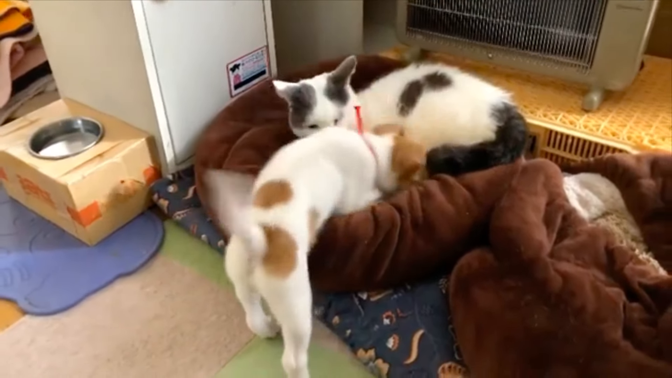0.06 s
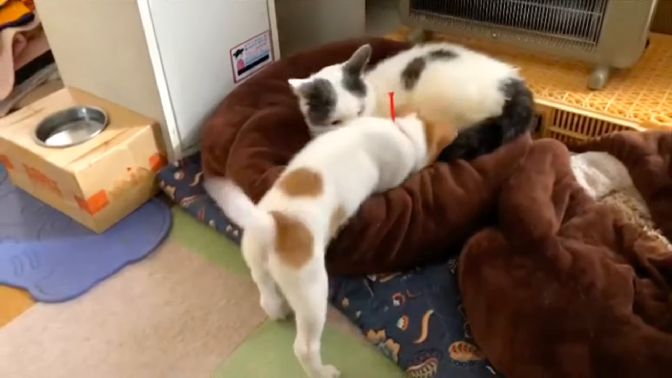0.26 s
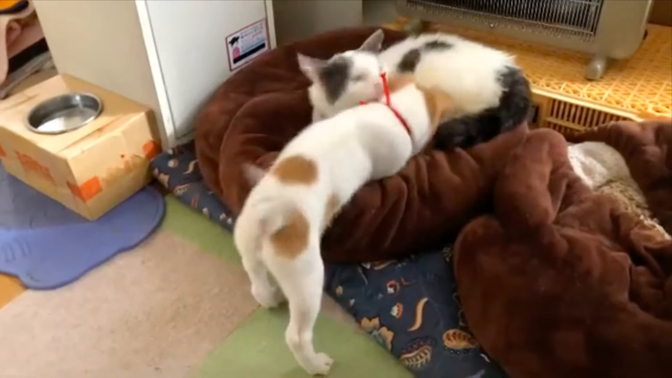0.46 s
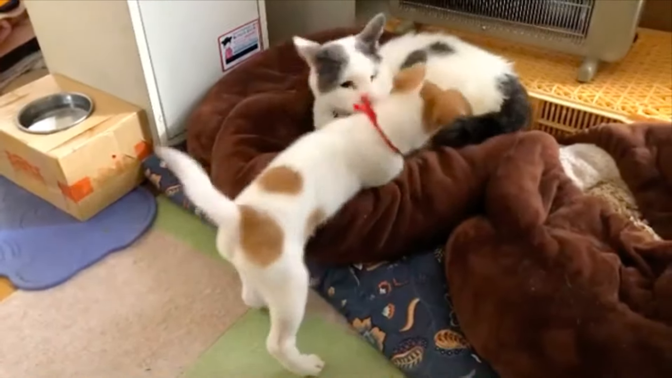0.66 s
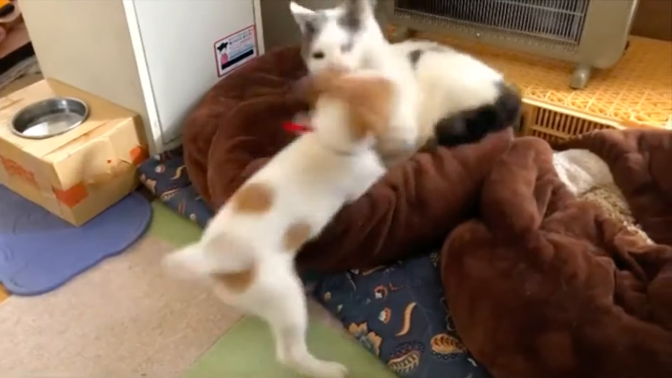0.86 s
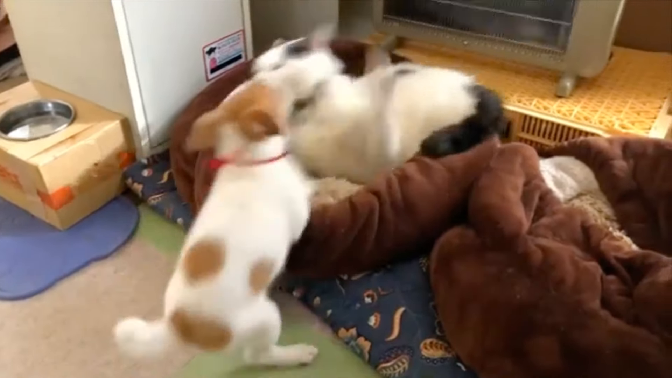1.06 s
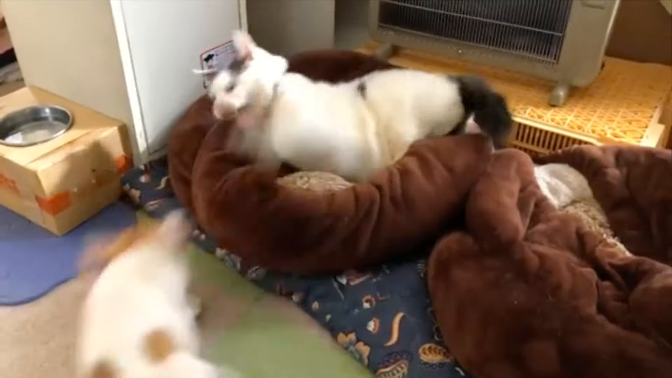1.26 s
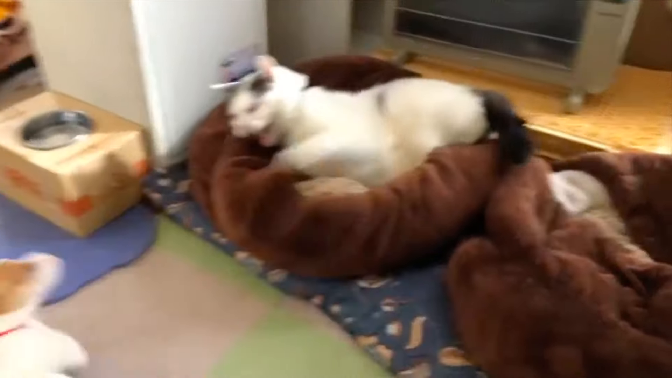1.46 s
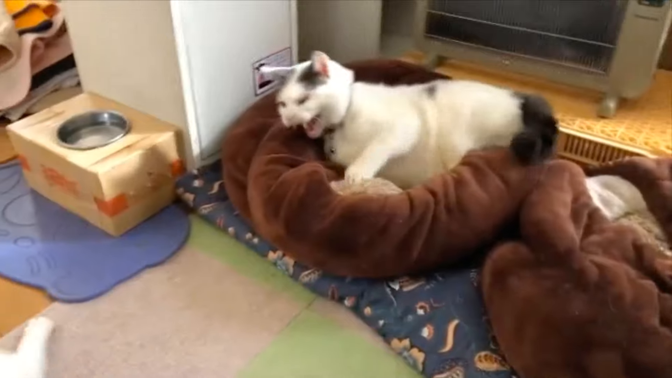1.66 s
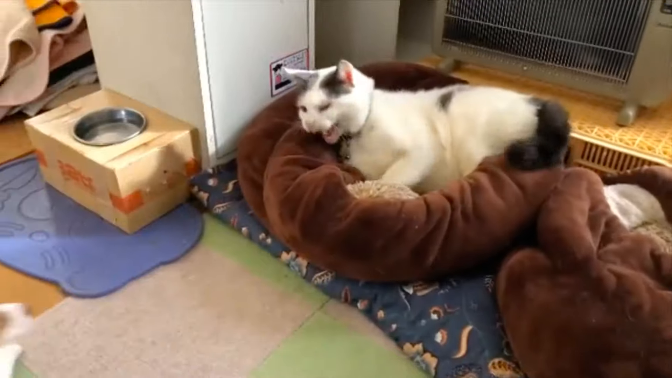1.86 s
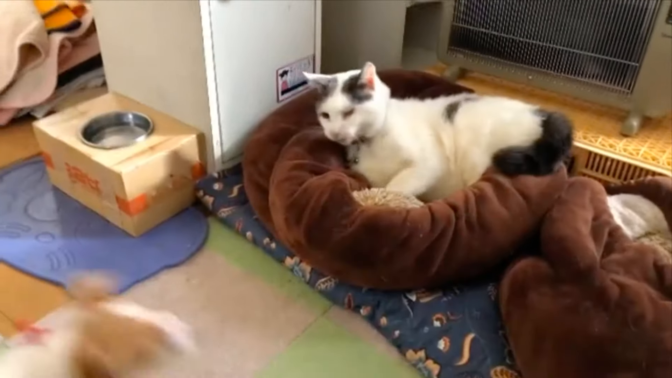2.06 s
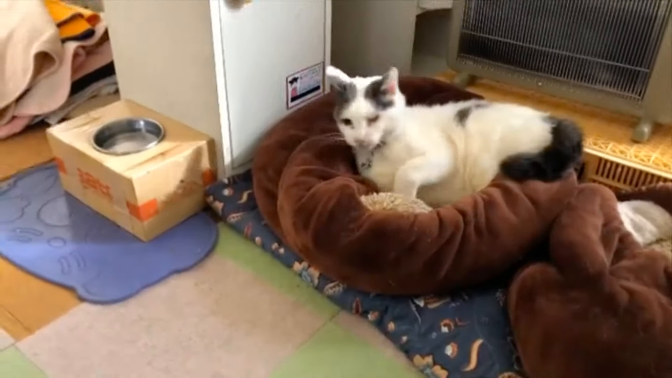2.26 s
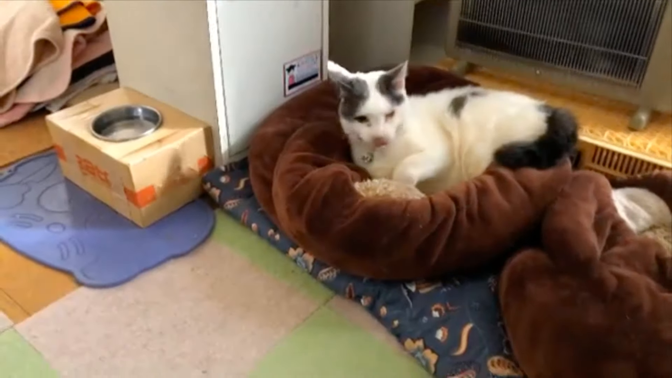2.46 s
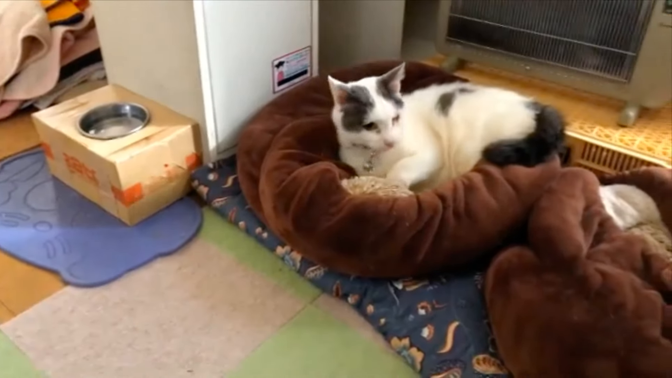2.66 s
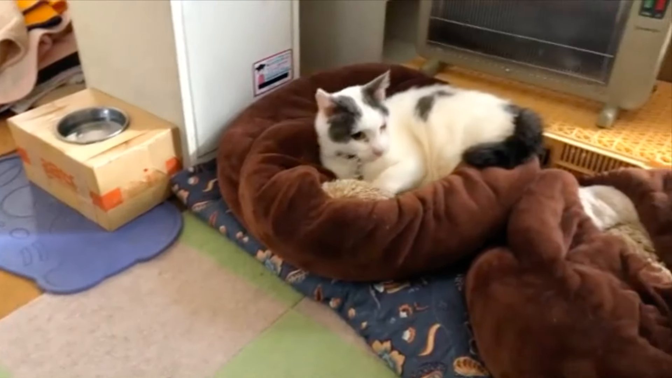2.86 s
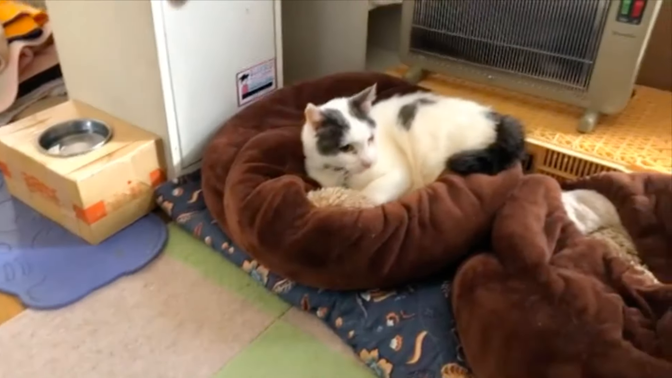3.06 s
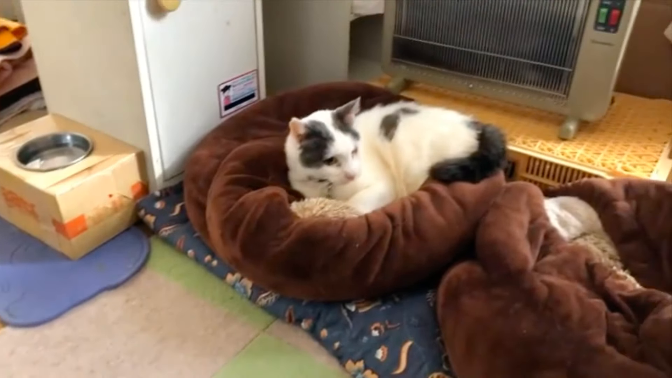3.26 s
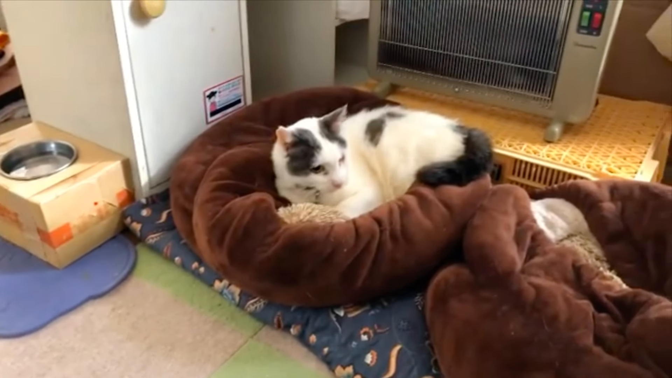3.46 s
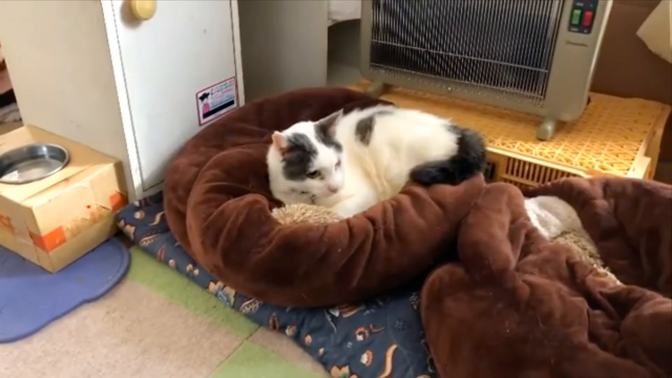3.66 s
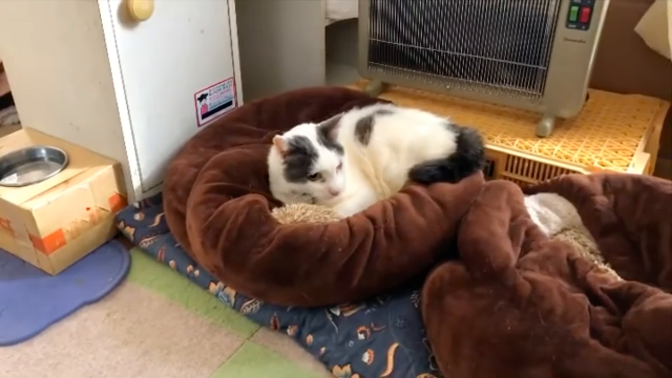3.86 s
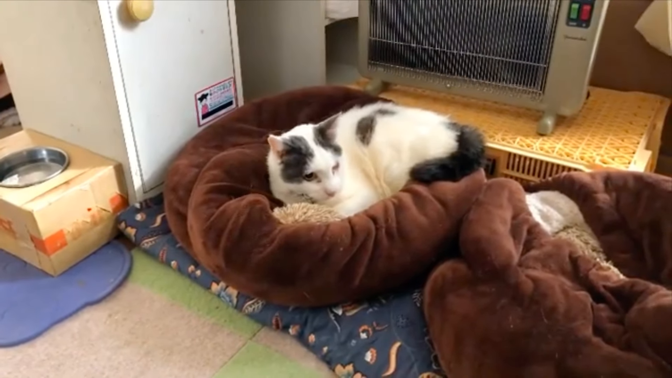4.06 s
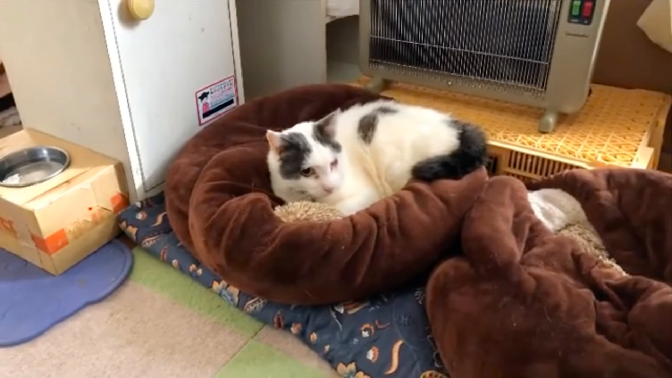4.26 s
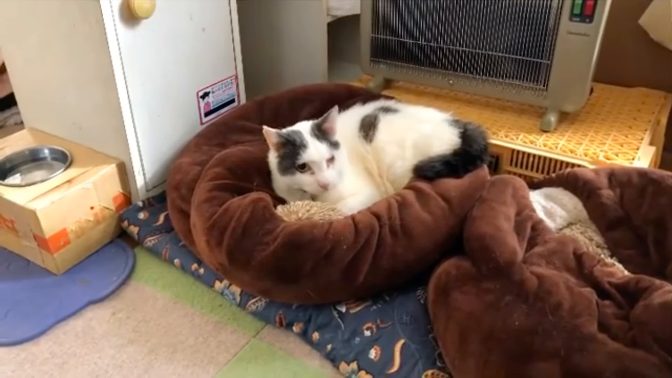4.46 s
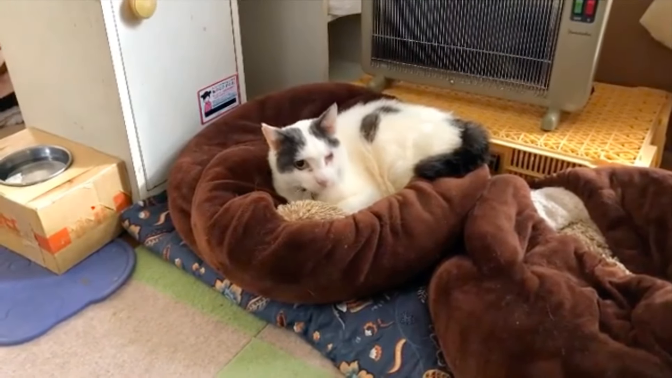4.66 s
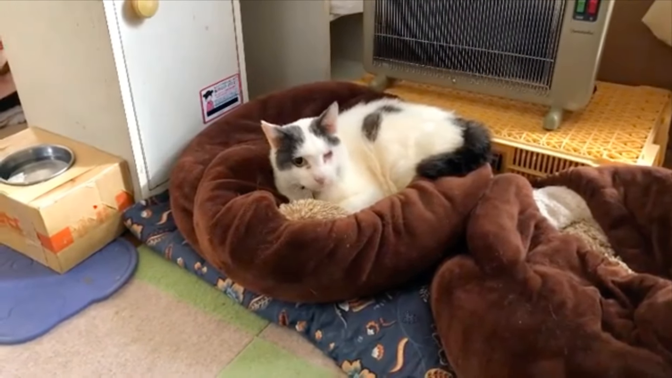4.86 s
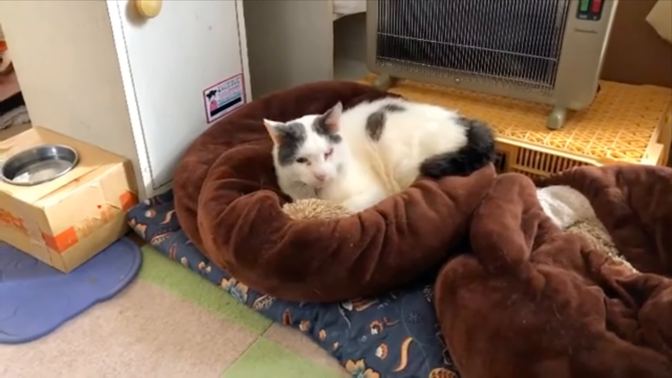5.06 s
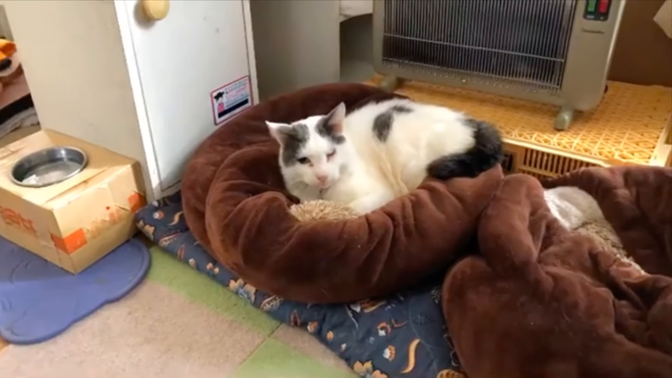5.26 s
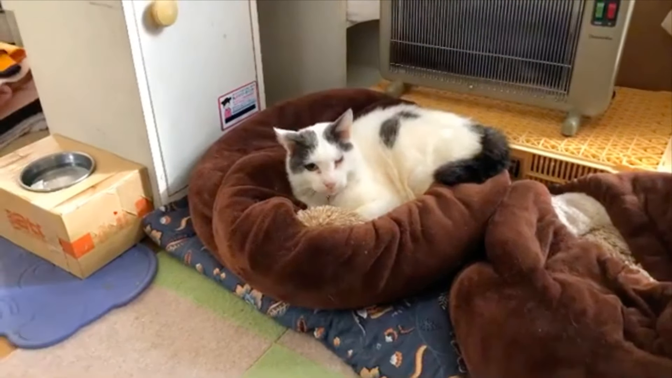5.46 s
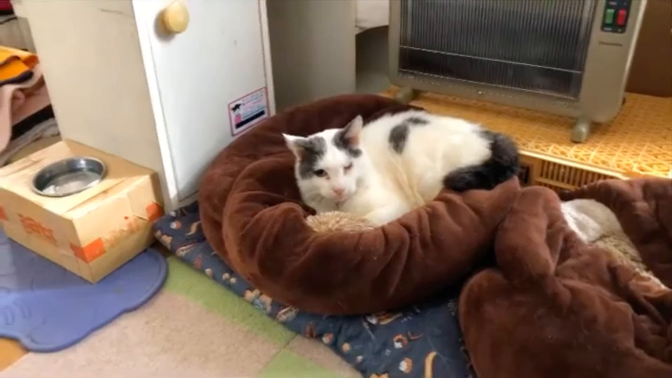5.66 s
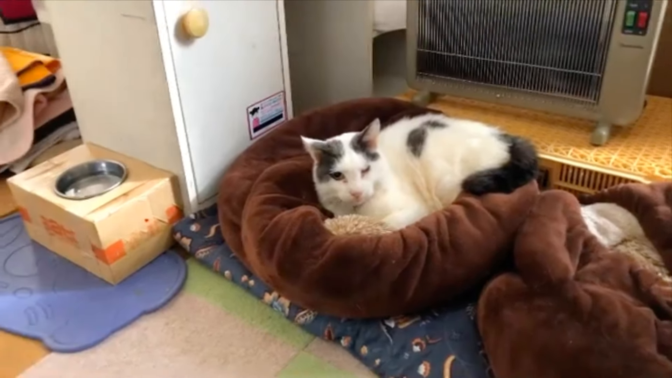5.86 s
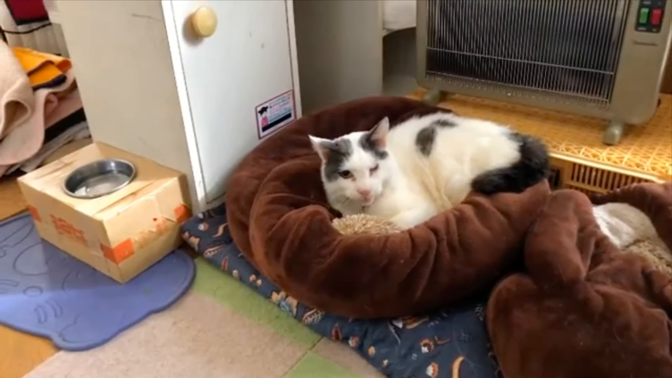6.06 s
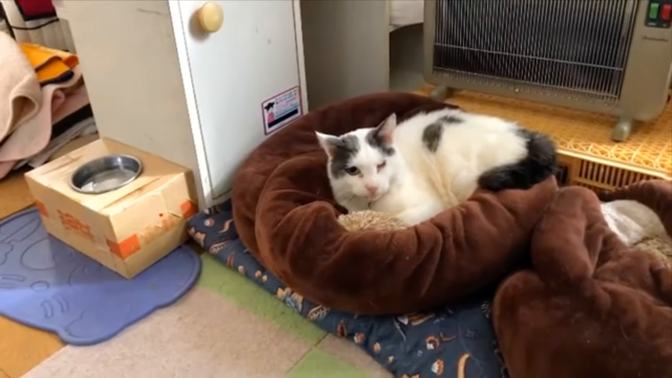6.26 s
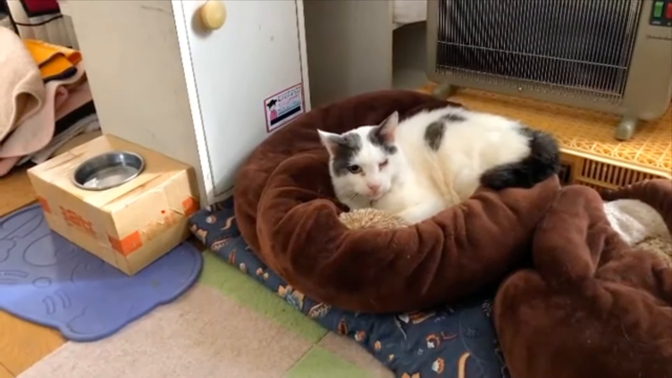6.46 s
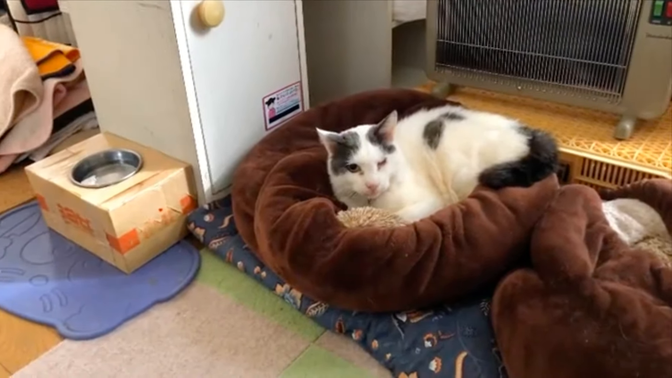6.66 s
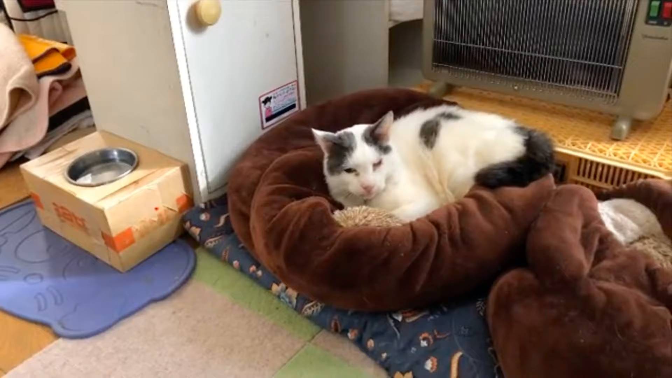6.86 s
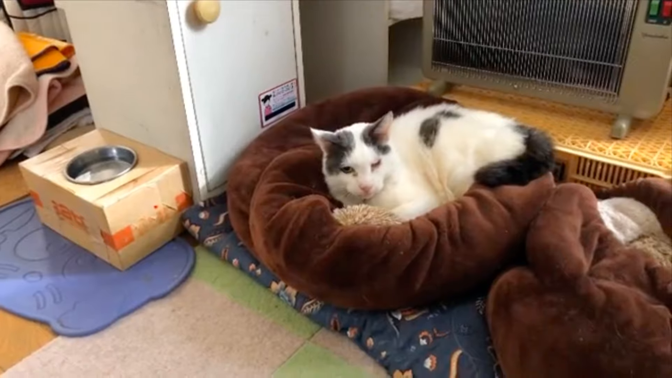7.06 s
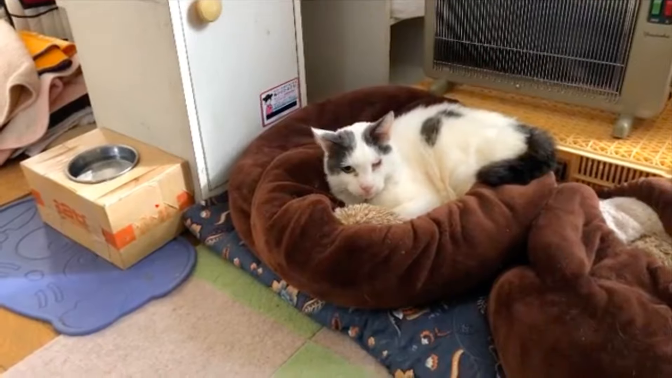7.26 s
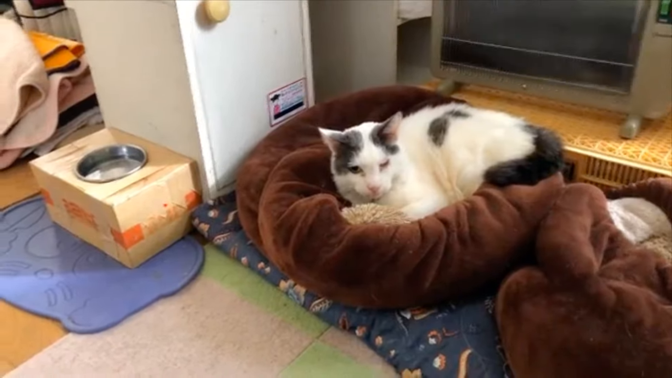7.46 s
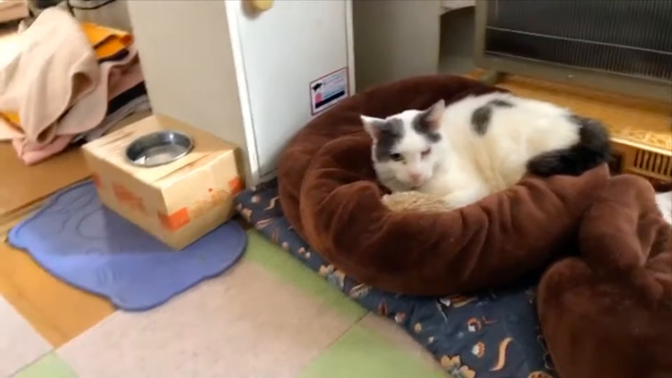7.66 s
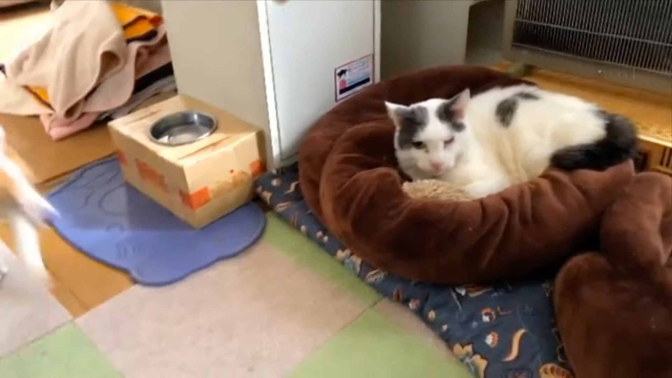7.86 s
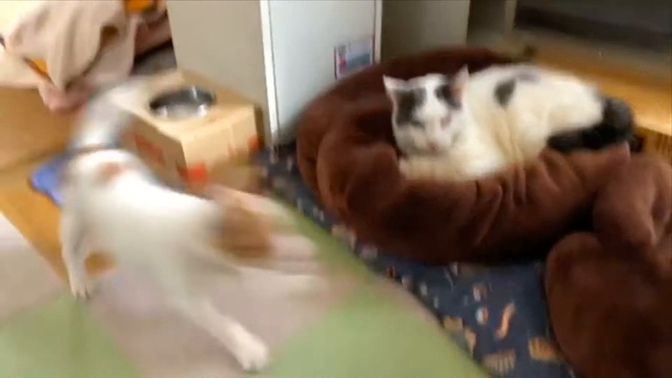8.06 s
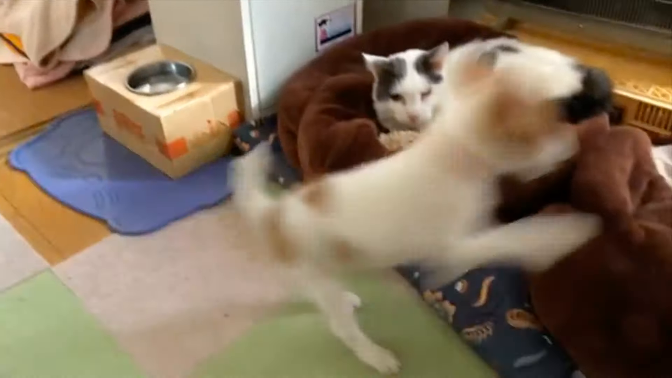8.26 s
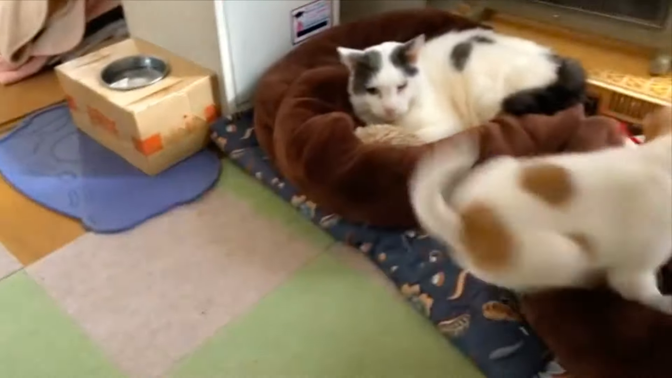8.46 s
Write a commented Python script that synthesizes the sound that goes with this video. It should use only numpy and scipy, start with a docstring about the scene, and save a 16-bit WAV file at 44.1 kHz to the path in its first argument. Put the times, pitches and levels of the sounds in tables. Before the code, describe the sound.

A furnished small room hums low with a faint fan drone throughout. At about 0.5 s a nearby cat utters a short, rough mew, rising then falling as it closes, lasting 0.3 s. From 0.8 to 1.3 s there is a scuffle: dull smacks, crisp snaps, fur rustle and a tiny, high collar bell rattling. At 1.3 s the cat spits into a forceful, airy hiss until about 1.95 s, while deep floor booms mark the puppy bounding off. Lighter thumps follow near 2.2 s. From 2.45 to 3.9 s claws dig at carpet in rapid, quickening scratches, strongest around 3.3 s. Hollow knocks and rustles run from 4 to 5 s, then heavy pounces boom at 5.2-5.6 s. Claws tick over boards at 5.9-6.35 s; near quiet follows. At 7.4 s clicks and thuds return, galloping closer to 8.4 s with a snap and faint hoarse skids.

```python
"""The low hum of a small room is heard first; then a cat in its bed mews as a puppy pesters it.
They scuffle, a collar bell jingles and the cat hisses. The puppy romps off, scrabbles at the carpet,
pounces, skitters over bare boards and gallops back, and the wooden floor booms under its paws.
Voice and breath are sources filtered by resonances, floor and bell are sums of decaying modes,
and friction is shaped, grainy noise."""
import sys
import numpy as np
from scipy import signal
from scipy.fft import rfft, irfft, next_fast_len
from scipy.io import wavfile
from scipy.ndimage import uniform_filter1d

SR = 44100
rng = np.random.default_rng(int(sys.argv[2]) if len(sys.argv) > 2 else 0)


def generate_wav(sig):
    """Save sig (samples, or channels by samples) to the path in sys.argv[1] as 16-bit PCM at SR."""
    pcm = np.round(np.clip(np.atleast_2d(sig).T, -1, 1) * 32767).astype(np.int16)
    wavfile.write(sys.argv[1], SR, pcm)


N = 375732
TIME = np.arange(N) / SR
BLOW = TIME[:SR // 2]  # time axis of one impact [s]


def amp(db):
    """Level: decibels to amplitude gain."""
    return 10 ** (np.asarray(db) / 20)


def unit(x):
    """Normalisation: scales a signal to rms 1."""
    return x / np.sqrt(np.mean(x ** 2) + 1e-20)


def read(points, hz):
    """Interpolation: reads a curve on a log-frequency axis."""
    f, value = np.transpose(points)
    return np.interp(np.log(hz + 1), np.log(f), value)


def add(mix, s, sound):
    """Superposition: mixes a sound in at s seconds."""
    part = mix[max(round(s * SR), 0):][:len(sound)]
    part += sound[:len(part)]


def wander(size, hz):
    """Low-pass fluctuation: smooth chance of rms 1, with a Gaussian roll-off at hz."""
    draws = rng.standard_normal(next_fast_len(size))
    f = np.fft.rfftfreq(len(draws), 1 / SR)
    smooth = irfft(rfft(draws) * np.exp(-(f / hz) ** 2), len(draws))
    return unit(smooth[:size])


def noise(spectrum, size, grain_db=0, ripple_db=0):
    """Spectral shaping: coloured noise of rms 1, clumped into millisecond grains, with chance peaks."""
    padded = next_fast_len(size)
    hz = np.fft.rfftfreq(padded, 1 / SR)
    grains = rng.standard_normal(padded) * amp(grain_db * wander(padded, 940))
    knots = np.arange(0, SR, 330)  # the peaks are a few hundred Hz wide
    ripple = ripple_db * np.interp(hz, knots, rng.standard_normal(len(knots)))
    shaped = irfft(rfft(grains) * amp(read(spectrum, hz) + ripple), padded)
    return unit(shaped[:size])


def resonate(x, hz, width):
    """Resonance: shifts hz down to zero, low-passes twice and shifts back; hz may follow a curve."""
    turn = np.exp(2j * np.pi * np.cumsum(hz * np.ones(len(x))) / SR)
    r = np.exp(-np.pi * width / SR)
    slow = signal.lfilter([(1 - r) ** 2], [1, -2 * r, r * r], x / turn + 1e-18)
    return 2 * (turn * slow).real


def burst(rise, t60):
    """Impact envelope: a quick rise and an exponential decay, peak 1."""
    shape = (1 - np.exp(-BLOW / rise)) * np.exp(-np.log(1000) * BLOW / t60)
    return shape / shape.max()


def uneven(start, gap, count, scatter):
    """Loose rhythm: each beat is displaced by a random share of the gap."""
    return start + gap * (np.arange(count) + scatter * rng.standard_normal(count))


# the cat's complaint: (time [s], pitch [Hz], level [dB], roughness [ratio, held to 0.25-1])
MEW = [(.475, 540, -61, .55), (0.504, 578, -41.5, 0.3), (.548, 587, -42.5, 0.4), (.563, 634.5, -32, 0.23),
       (.585, 626.6, -32, 0.35), (.605, 682, -33, 0.54), (.625, 713.5, -40, 0.94), (.643, 692, -26.5, 0.71),
       (.665, 719, -33, 0.32), (0.693, 640, -34, 0.5), (.731, 600, -32, 1.04), (.76, 520, -60, 0.8)]
# fixed resonances of the throat: (frequency [Hz], width [Hz], relative level [dB])
THROAT = [(680, 190, -3), (1430, 47, 2.5), (2010, 210, -3), (3040, 360, -13), (5570, 960, -16)]
# the moving resonance of the mouth starts to fall at the given time
MOUTH_OPEN_HZ, MOUTH_SHUT_HZ, MOUTH_CLOSES_S = 2590, 1370, 0.6


def mew(jitter=0.0474, mouth_width_hz=900, shimmer_db=3):
    """Source-filter principle: jittery vocal pulses and breath pass a mouth that closes."""
    s, *columns = np.transpose(MEW)
    t = np.arange(s[0], s[-1], 1 / SR)
    hz, db, rough = (np.interp(t, s, c) for c in columns)
    mouth_hz = np.interp(t, [MOUTH_CLOSES_S, s[-1]], [MOUTH_OPEN_HZ, MOUTH_SHUT_HZ])
    rough = np.clip(rough, .25, 1)
    # roughness scales the jitter of pitch and the shimmer of level
    turns = np.cumsum(hz * (1 + jitter * rough * wander(len(t), 210))) / SR
    harmonics = sum(np.cos(2 * np.pi * k * turns) for k in range(1, 11))
    folds = unit(harmonics) * amp(shimmer_db * rough * wander(len(t), 210))
    breath_puffs = (1 + np.cos(2 * np.pi * turns)) * rng.standard_normal(len(t))
    drive = (1 - rough / 2) * folds + rough * breath_puffs
    drive *= 1 + rough * np.cos(np.pi * turns) / 2  # strong and weak pulses alternate as the voice breaks
    voice = resonate(drive, mouth_hz, mouth_width_hz)
    voice += sum(amp(g) * resonate(drive, f, w) for f, w, g in THROAT)
    loudness = np.sqrt(uniform_filter1d(voice ** 2, size=900) + 1e-12)
    out = np.zeros(N)
    add(out, s[0], amp(db) * voice / loudness)
    return out


# mouth resonances of the long breath: (frequency [Hz], width [Hz], relative level [dB])
HISS_MOUTH = [(890, 780, 2), (1240, 720, 2), (2620, 1060, -3), (3530, 240, -0.5), (4230, 510, -3),
              (5000, 1030, -3.5)]
# mouth resonances of the spit: (frequency [Hz], width [Hz], relative level [dB])
SPIT_MOUTH = [(940, 180, -3), (2910, 450, -8.5), (3680, 550, -4), (5230, 890, -8)]
# spectrum of the open breath: (frequency [Hz], relative density [dB per Hz])
HISS_AIR = [(150, 2.5), (300, 3.5), (600, -6.5), (1900, -32), (4000, -17), (6500, -11), (9000, -28)]
# spectrum of air past the teeth: (frequency [Hz], relative density [dB per Hz])
HISS_TEETH = [(4000, -39), (6500, -5), (8500, -1.5), (10500, 1.5), (12000, 1.5), (14000, -5)]
# one breath: attack, hold and release
HISS_START_S, HISS_ATTACK_S, HISS_END_S, HISS_RELEASE_DB_PER_S = 1.295, 0.05, 1.94, 173
HISS_BURST_DB, HISS_BURST_S = 5.5, 0.019  # extra pressure at the top of the attack, and its time constant
HISS_ECHO_MS, HISS_ECHO_DRIFT_MS_PER_S, HISS_ECHO_DB = 3.6, 3.8, -9


def hiss(air_db=-4, flutter_db=0.8):
    """Turbulence noise: a spit through a tight throat opens into a breath that sizzles past the teeth."""
    spit = breath_through(SPIT_MOUTH) * breath(-26, sag_db_per_s=35)
    air = breath_through(HISS_MOUTH) + amp(air_db) * noise(HISS_AIR, N)
    body = unit(air) * breath(-26, sag_db_per_s=-0.5)
    teeth = noise(HISS_TEETH, N, grain_db=2.5) * breath(-26, sag_db_per_s=12.5)
    return drifting_echo(spit + body + teeth) * amp(flutter_db * wander(N, 38))


def breath_through(resonances, tremble=.022, flicker_db=1.5, rasp_db=2.8):
    """Formant filtering: rasping air in mouth resonances that shift as tongue and jaw tremble."""
    rasp = amp(rasp_db * wander(N, 330))
    out = np.zeros(N)
    for hz, width, db in resonances:
        level = amp(db + flicker_db * wander(N, 3.3))
        moving_hz = hz * (1 + tremble * wander(N, 10))
        out += level * resonate(rasp * rng.standard_normal(N), moving_hz, width)
    return unit(out)


def breath(level_db, sag_db_per_s):
    """Pressure envelope: attack with a burst, a drifting hold (a negative sag swells), release."""
    age = TIME - HISS_START_S
    held = np.maximum(age - HISS_ATTACK_S, 0)
    released = np.maximum(TIME - HISS_END_S, 0)
    db = level_db + HISS_BURST_DB * np.exp(-held / HISS_BURST_S) - sag_db_per_s * held
    return np.clip(age / HISS_ATTACK_S, 0, 1) ** 2 * amp(db - HISS_RELEASE_DB_PER_S * released)


def drifting_echo(x):
    """Comb interference: a cabinet reflection whose path lengthens as the cat draws back; notches fall."""
    delay_s = (HISS_ECHO_MS + HISS_ECHO_DRIFT_MS_PER_S * (TIME - HISS_START_S)) / 1000
    echo = amp(HISS_ECHO_DB) * np.interp(TIME - delay_s, TIME, x)
    return (x + echo) / np.hypot(1, amp(HISS_ECHO_DB))


# swats and knocks: (time [s], smack level [dB], bright snap level [dB], t60 [s])
SWATS = [(.826, -21, -40.5, 0.029), (.911, -26, -31, 0.058), (.926, -44, -16, 0.033),
         (1.061, -35, -15, 0.021), (1.072, -31, -40, 0.029), (1.085, -23.5, -20, 0.032),
         (1.088, -11, -29, 0.0098), (1.184, -44, -20, 0.027), (1.201, -51, -19, 0.062),
         (1.217, -32, -18, 0.1), (1.261, -12, -23, 0.019), (1.268, -15, -32, 0.0087),
         (2.288, -36, -61, .06), (2.683, -27, -43, 0.039), (5.224, -24, -55, 0.033),
         (5.555, -25, -54, 0.023), (5.8, -32.5, -16.5, 0.12), (8.186, -54, -21.5, 0.06)]
# spectrum of the smack: (frequency [Hz], relative density [dB per Hz])
SMACK = [(200, -5), (800, 7.5), (1400, 3), (2700, -4.5), (5000, -10.5), (9000, -51)]
# spectrum of the snap: (frequency [Hz], relative density [dB per Hz])
SNAP = [(2500, -21.5), (5500, -6.5), (7000, -6), (8900, 7), (10500, -1), (14000, -5)]


def swats():
    """Impact noise: paws, claws and collar strike things with a dull smack and a crackling snap."""
    out = np.zeros(N)
    for s, smack, snap, t60 in SWATS:
        strike = burst(.0002, t60)
        dull = noise(SMACK, len(BLOW), grain_db=1.5, ripple_db=3) * strike
        crackle = noise(SNAP, len(BLOW), grain_db=2, ripple_db=2.5) * strike
        blow = amp(smack) * unit(dull) + amp(snap) * unit(crackle)
        add(out, s, blow * np.sqrt(np.mean(strike ** 2)))
    return out


# single strikes of the pellet in the collar bell, strong and faint: (time [s], relative level [dB])
JINGLES = [(.925, -16), (0.989, -24.5), (1.06, -18.5), (1.1233, -18), (1.1539, -19), (1.1837, -17),
           (1.2008, -9), (1.2156, -15), (1.5045, -25), (1.666, -24.5), (2.815, -36.5)]
# modes of the bell: (frequency [Hz], relative level [dB], t60 [s])
BELL = [(8800, -25, 0.085), (9610, -8, 0.15), (9640, 1, 0.025), (10400, -19, 0.11), (12790, -36, .1)]
# the pellet bounces about during the scuffle
RATTLE_START_S, RATTLE_GAP_S, RATTLE_DB = 1.085, .027, -20.5


def bell(level_db=-3):
    """Modal synthesis: each strike rings the inharmonic modes of a tiny pellet bell damped by fur."""
    out = np.zeros(N)
    rattle = [(s, RATTLE_DB) for s in uneven(RATTLE_START_S, RATTLE_GAP_S, count=7, scatter=.12)]
    for s, db in JINGLES + rattle:
        ring = np.zeros(len(BLOW))
        for hz, mode_db, t60 in BELL:
            struck_hz = hz * (1 + 0.0017 * rng.standard_normal())
            ring += amp(mode_db) * burst(0.00076, t60) * np.sin(2 * np.pi * struck_hz * BLOW)
        add(out, s, amp(db + level_db) * ring)
    return out


# paws and bodies landing: (time [s], relative boom level [dB], relative knock level [dB])
THUMPS = [(0.992, -21.5, -33), (1.173, -23.5, -35.5), (1.334, -12, -28), (1.368, -3.5, -25),
          (1.429, 2.5, -39), (1.461, 3, -33), (1.495, -8, -33), (1.645, -15, -31.5), (1.822, -13.5, -26),
          (2.13, -15.5, -32), (2.22, -17.5, -37), (2.3, -11, -23.5), (3.183, -28, -24.5), (3.253, -26, -26),
          (3.543, -18, -40), (3.611, -33, -24), (4.142, -38, -16), (4.181, -25, -13), (4.254, -13, -17),
          (4.386, -26, -19.5), (4.558, -25, -20), (4.61, -19, -22), (4.789, -40, -20.5), (4.816, -42, -14),
          (4.869, -19, -18.5), (4.964, -12.5, -13), (5.001, -24, -37), (5.203, -28, -12), (5.221, -4.5, -7),
          (5.249, -23, -12), (5.28, 0.5, -19), (5.447, -3, -19), (5.549, 0, -8.5), (5.837, -26, -22),
          (5.876, -13.5, -25.5), (5.987, -15, -29), (6.085, -19, -43), (6.156, -12, -24.5),
          (6.255, -23, -20), (6.343, -22, -21.5), (7.434, -23.5, -25), (7.569, -23.5, -26),
          (7.643, -15, -26.5), (7.687, -11, -51), (7.784, -13, -33), (7.827, -11, -37), (7.97, -38, -21.5),
          (8.011, -13.5, -28), (8.091, -10, -26), (8.143, -6, -38), (8.192, -32, -14), (8.244, -8.5, -19),
          (8.33, -28, -22.5), (8.371, -15.5, -18.5)]
# modes of the floor: (frequency [Hz], relative level [dB], t60 [s])
FLOOR = [(106, -0.5, 0.21), (134.3, 4.5, 0.16), (164.1, -5, 0.25), (189.5, -10.5, 0.45),
         (217.4, -1.5, 0.065), (258.5, -6.5, 0.17), (317.6, -16, 0.43), (370.5, -12, 0.39), (452, -3, 0.09),
         (541, -11.5, 0.12), (702, -11.5, 0.13)]
# spectrum of the pad's own pat: (frequency [Hz], relative density [dB per Hz])
PAD = [(100, -15), (250, 10), (400, 7.5), (700, -15.5), (1100, -11), (2000, -23), (5000, -54)]
SLAP_OF_KNOCK_DB = -11.5  # share of each knock that reaches the floor's high modes
# light steps as the puppy shifts its weight while it digs
SHUFFLE_START_S, SHUFFLE_GAP_S, SHUFFLE_BOOM_DB, SHUFFLE_KNOCK_DB = 2.535, .143, -26, -28.5


def thumps(slap_db=1, pat_db=1, pat_t60=0.12, spot_db=2, shift=0.0373):
    """Modal excitation: knock level drives the floor's higher modes, and each spot weights them anew."""
    out = np.zeros(N)
    hz, mode_db, t60 = np.transpose(FLOOR)
    for s, boom, knock in THUMPS + shuffle():
        slap = knock + SLAP_OF_KNOCK_DB
        force_db = read([(105, boom), (135, knock), (260, knock), (370, slap + slap_db)], hz)
        # modes above 150 Hz differ in sign, level and pitch from board to board
        weight = rng.choice([-1, 1], len(hz)) * amp(spot_db * rng.standard_normal(len(hz)))
        spot = np.where(hz > 150, weight, 1)
        detune = np.where(hz > 150, 1 + shift * rng.standard_normal(len(hz)), 1)
        rings = np.array([burst(0.6 / f, d) * np.sin(2 * np.pi * f * BLOW)
                          for f, d in zip(hz * detune, t60)])
        pat = amp(slap + pat_db) * noise(PAD, len(BLOW)) * burst(0.003, pat_t60)
        add(out, s, (amp(force_db + mode_db) * spot) @ rings + pat)
    return out


def shuffle(count=11, spread_db=2):
    """Gait rhythm: light, uneven steps as rows (time [s], boom [dB], knock [dB])."""
    force_db = spread_db * rng.standard_normal(count)
    s = uneven(SHUFFLE_START_S, SHUFFLE_GAP_S, count, scatter=0.0771)
    return list(zip(s, SHUFFLE_BOOM_DB + force_db, SHUFFLE_KNOCK_DB + force_db))


# hollow knocks and light scuffs of the paws, each ringing one board:
# (time [s], relative level [dB], pitch [Hz])
KNOCKS = [(2.290, -23, 683), (3.065, -25.5, 844), (3.438, -21.5, 970), (3.615, -19, 903), (3.774, -13, 267),
          (4.031, -21.5, 427), (4.179, -14, 527), (4.569, -7.5, 272), (4.814, -21.5, 1310),
          (4.826, -9, 264), (4.935, -23, 904), (4.963, -3, 307), (5.224, -7, 632), (5.25, -5.5, 325),
          (5.28, -7, 370), (5.547, -5, 336), (5.556, -17, 612), (6.212, -22.5, 703), (7.970, -17, 494)]


def knocks(level_db=-4, t60_at_330_hz=0.078):
    """Single-mode resonance: one board rings briefly at its own pitch, high ones more briefly."""
    out = np.zeros(N)
    for s, db, hz in KNOCKS:
        rough = unit(resonate(rng.standard_normal(len(BLOW)), hz, hz))
        ring = np.sin(2 * np.pi * hz * BLOW) + 0.09 * rough
        add(out, s, amp(db + level_db) * ring * burst(0.3 / hz, t60_at_330_hz * np.sqrt(330 / hz)))
    return out


# single strokes of the claws over the carpet: (time [s], relative level [dB], relative treble level [dB])
SCRAPES = [(4.1756, -31, -60), (4.3041, -33, -47), (4.8118, -34.5, -46), (5.2913, -32.5, -39.5),
           (5.5086, -29, -42)]
# spectrum of the carpet pile: (frequency [Hz], relative density [dB per Hz])
PILE = [(400, 1), (900, 6), (1600, 2), (2400, -5.5), (3600, -13.5), (5500, -18), (9000, -51)]
# spectrum of rubbed fibres, here and under the rustle: (frequency [Hz], relative density [dB per Hz])
FIBRES = [(2500, -2.5), (5500, 0), (8000, -4.5), (14000, -10.5)]
# digging at the carpet: the forepaws alternate, and the gap between strokes keeps shrinking
DIG_START_S, DIG_GAP_S, DIG_QUICKEN_S = 2.453, .1, .00051
# effort builds to a peak and eases off
DIG_DB, DIG_PEAK_S, DIG_BUILD_DB_PER_S, DIG_EASE_DB_PER_S = -26, 3.31, 8, 7
OFF_PAW_EARLY_DB, OFF_PAW_LATE_DB = -9, -1.5
DIG_TREBLE_DB = -15  # hiss of the fibres, relative to the stroke
SNAG_DB = 1


def scrapes(pile_db=-6, fibre_db=-2, snag_hz=2450, t60=0.12):
    """Friction: claws snag the carpet, then drag through the pile; hard strokes snag the most."""
    out = np.zeros(N)
    pluck = burst(.0002, .04)
    for s, db, treble in digging() + SCRAPES:
        catch = unit(resonate(rng.standard_normal(len(BLOW)), snag_hz, 2060))
        snag = amp(SNAG_DB + db + .2 * (db - DIG_DB)) * catch * pluck
        tufts = noise(PILE, len(BLOW), grain_db=3.5, ripple_db=2.8)
        pile = amp(db + pile_db) * tufts * burst(0.012, t60)
        fibres = noise(FIBRES, len(BLOW), grain_db=3, ripple_db=2)
        drag = amp(treble + fibre_db) * fibres * burst(0.021, 0.18)
        add(out, s, snag + pile + drag)
    return out


def digging(count=16):
    """Accelerating rhythm: strokes of alternate forepaws as rows (time [s], level [dB], treble [dB])."""
    k = np.arange(count)
    s = DIG_START_S + k * (DIG_GAP_S - DIG_QUICKEN_S * k)
    early = s < DIG_PEAK_S
    off_paw_db = np.where(early, OFF_PAW_EARLY_DB, OFF_PAW_LATE_DB) * (k % 2 == 0)
    slope = np.where(early, DIG_BUILD_DB_PER_S, DIG_EASE_DB_PER_S)
    db = DIG_DB - slope * abs(s - DIG_PEAK_S) + off_paw_db
    return list(zip(s, db, db + DIG_TREBLE_DB))


# claws tapping on the boards: (time [s], relative level [dB], pitch [Hz])
CLAWS = [(2.2942, -25, 4020), (5.9015, -14.5, 4260), (5.9679, -17, 4350), (5.9948, -20.5, 3400),
         (6.046, -21, 3700), (6.0634, -16.5, 4540), (6.1502, -18, 4600), (6.208, -14.5, 5000),
         (6.2303, -21, 5600), (6.25, -20.5, 3600), (6.34, -18.5, 4770), (7.422, -22, 3400),
         (7.447, -18, 3710), (7.518, -18, 3430), (7.553, -31, 3470), (7.5668, -8, 3040),
         (7.5733, -18, 4740), (7.634, -23.5, 3320), (7.67, -19.5, 3020), (7.7293, -20.5, 3930),
         (7.7719, -22, 3940), (8.107, -26.5, 4600)]
# spectrum of a claw on wood: (frequency [Hz], relative density [dB per Hz])
CLAW = [(500, -9.5), (1500, -11), (2000, -9), (2600, -4.5), (3300, -7), (4800, -3), (6300, -10),
        (7500, -14.5), (14000, -24.5)]


def claws(level_db=-7, ring_db=-5, ring_width_hz=1400, slide_db=-17, slide_t60=0.22):
    """Impact and friction: hard, short ticks, each with its own pitch, then a gritty slide."""
    out = np.zeros(N)
    strike = burst(.0002, .024)
    for s, db, hz in CLAWS:
        ring = unit(resonate(rng.standard_normal(len(BLOW)), hz, ring_width_hz))
        crack = noise(CLAW, len(BLOW), ripple_db=4)
        tick = (crack + amp(ring_db) * ring) * strike
        tick *= np.linalg.norm(strike) / np.linalg.norm(tick)  # same energy for every tick
        scratch = noise(CLAW, len(BLOW), grain_db=7)
        slide = amp(slide_db) * scratch * burst(0.00078, slide_t60)
        add(out, s, amp(db + level_db) * (tick + slide))
    return out


# paw pads skidding with a hoarse squeak: (time [s], length [s], pitch [Hz], level [dB])
SKIDS = [(8.108, 0.026, 1920, -49), (8.221, 0.07, 1780, -41.5), (8.245, 0.079, 2380, -51),
         (8.346, 0.016, 2320, -47)]


def skids(width_hz=320, octave_db=-8):
    """Stick-slip friction: the uneven slips of a pad give a fuzzy pitch and its octave."""
    out = np.zeros(N)
    for s, length, hz, db in SKIDS:
        slips = rng.standard_normal(round(length * SR))
        squeak = resonate(slips, hz, width_hz) + amp(octave_db) * resonate(slips, 2 * hz, 2 * width_hz)
        add(out, s, amp(db) * unit(squeak) * signal.windows.tukey(len(slips), .5))
    return out


# fur and paws sweeping over bedding and carpet:
# (start time [s], length [s], relative rub level [dB], relative swish level [dB])
RUSTLE = [(0.763, 0.34, -43, -47.5), (0.807, 0.19, -59, -38.5), (1.038, 0.06, -37, -33),
          (1.081, 0.255, -41, -33.5), (1.183, 0.087, -38, -24.5), (2.062, 0.21, -39.5, -51.5),
          (2.172, 0.067, -34.5, -44), (2.261, .76, -40.5, -52), (3.037, 0.97, -34, -51.5),
          (3.4, 0.093, -36, -55), (4.026, .15, -33, -51.5), (4.084, 1, -37.5, -56.5),
          (4.863, 0.12, -38, -55), (5.011, .11, -38, -48), (5.104, 0.24, -34, -50), (5.279, 0.1, -35, -43),
          (5.404, 0.26, -39.5, -61), (5.83, .11, -30, -38.5), (5.896, 0.558, -46.5, -49),
          (6.19, 0.18, -46, -60), (6.435, 0.13, -39, -56.5), (6.534, 0.25, -43.5, -54),
          (6.97, 0.1, -41.5, -68), (7.405, 0.54, -43.5, -46), (7.927, 0.52, -43, -55),
          (8.167, 0.045, -53, -31.5), (8.194, 0.11, -32, -49), (8.373, 0.046, -34, -41.5)]
# spectrum of the rub: (frequency [Hz], relative density [dB per Hz])
RUB = [(150, 8), (300, 8), (600, -1), (1000, -1.5), (1700, -7), (2500, -10), (4000, -14.5), (8000, -36.5)]
GRIT_PER_S, GRIT_DB = 220, -11.5  # stray ticks of grit and fibres under each sweep
SWEEP_EDGE_S = 0.033  # time a sweep takes to get going and to stop, less if it is very short


def rustle(rub_db=-2, swish_db=-1, clump_db=3):
    """Granular friction: fur on bedding and carpet; each sweep gets going, holds and stops."""
    low, high = np.zeros((2, N))
    for s, length, rub, swish in RUSTLE:
        edges = np.clip(2 * SWEEP_EDGE_S / length, 0, 1)
        speed = signal.windows.tukey(round(length * SR), edges)
        add(low, s, amp(rub + rub_db) * speed)
        add(high, s, amp(swish + swish_db) * speed)
    fibres = unit(noise(FIBRES, N, grain_db=2) + amp(GRIT_DB) * grit())
    friction = low * noise(RUB, N, grain_db=2.5) + high * fibres
    return friction * amp(clump_db * wander(N, 28.4))


def grit():
    """Random impulses: sparse ticks of uneven size, rms 1."""
    ticks = (rng.random(N) < GRIT_PER_S / SR) * rng.standard_normal(N)
    decay = np.exp(-BLOW / .0007)
    return unit(signal.fftconvolve(abs(ticks), decay)[:N] * noise(FIBRES, N))


# spectrum of the room noise: (frequency [Hz], relative density [dB per Hz])
HUM = [(15, -65), (25, -30), (54, -7), (140, -1.5), (151, -13), (202, -2), (250, -10), (666, -22.5),
       (1130, -29.5), (1330, -41), (2080, -34), (14000, -42.5)]
# drone of the fan: (frequency [Hz], width [Hz], level [dB])
FAN = [(66.8, 7.7, -52), (1295, 54, -60), (1430, 1050, -54)]


def hum(level_db=-41):
    """Stationary noise: a steady room sound with the narrow-band drone of a fan."""
    drone = sum(amp(db) * unit(resonate(rng.standard_normal(N), hz, width)) for hz, width, db in FAN)
    return amp(level_db) * noise(HUM, N, grain_db=1) + drone


# reverberation time of the room: (frequency [Hz], t60 [s])
ROOM = [(100, 0.68), (500, 0.21), (3000, 0.28), (8000, 0.062), (14000, 0.23)]


def room(x):
    """Reverberation: dense reflections of a furnished room, each band dying at its own speed."""
    taps = rng.standard_normal(len(BLOW)) * (BLOW > .004)  # silent until the first reflection
    hz, t, z = signal.stft(taps, SR, nperseg=256)
    decay = np.exp(-np.log(1000) * t / read(ROOM, hz)[:, None])
    tail = signal.istft(z * decay, SR, nperseg=256)[1]
    return signal.fftconvolve(x, tail / np.linalg.norm(tail))[:N]


def scene(near_wet_db=-11, far_wet_db=-6, floor_wet_db=-15):
    """Direct-to-reverberant ratio: the cat is close and dry; the puppy's claws, scrapes and skids sound farther
    off, while the floor's booms and knocks are drier still."""
    near = mew() + hiss() + swats() + bell()
    far = claws() + scrapes() + skids()
    floor = thumps() + knocks()
    echo = room(amp(near_wet_db) * near + amp(far_wet_db) * far + amp(floor_wet_db) * floor)
    return (near + far + floor + echo + rustle() + hum())[None]


def record(dry, low_cut_hz=60, edge_hz=14000):
    """Band limits and saturation: a small microphone loses deep bass and rounds off the loudest peaks."""
    x = signal.sosfilt(signal.butter(3, low_cut_hz, "highpass", fs=SR, output="sos"), dry)
    x = x / (1 + x ** 8) ** (1 / 8)
    low_pass = signal.firwin(511, edge_hz, window=("kaiser", 9), fs=SR)
    return signal.oaconvolve(x, low_pass[None], "same")


dry = scene()
out = record(dry)
generate_wav(out)
```